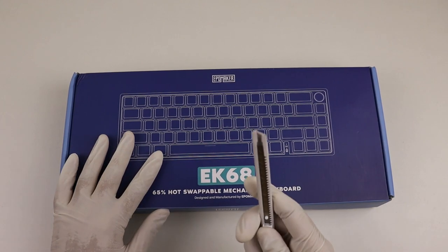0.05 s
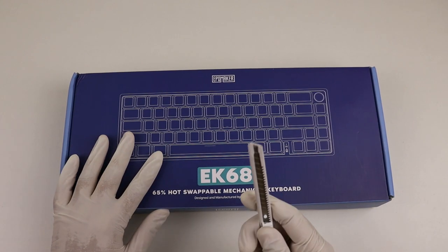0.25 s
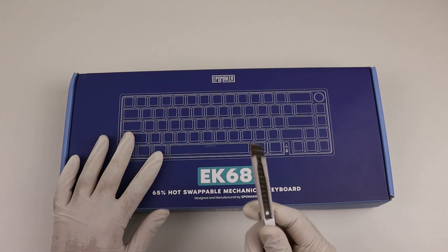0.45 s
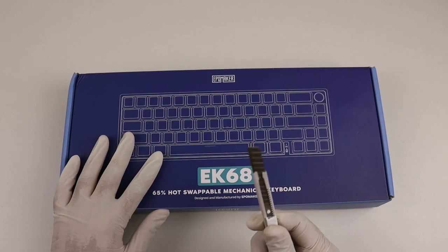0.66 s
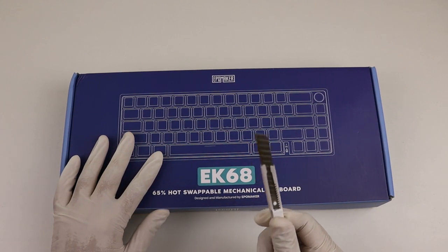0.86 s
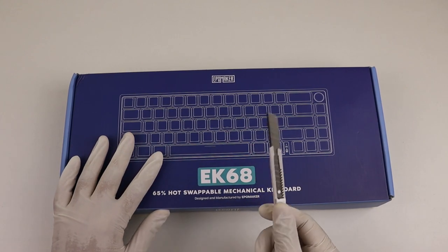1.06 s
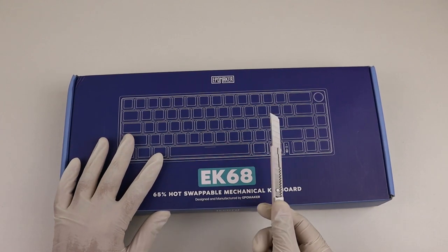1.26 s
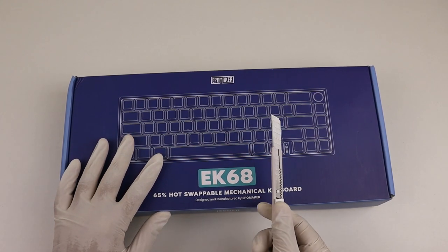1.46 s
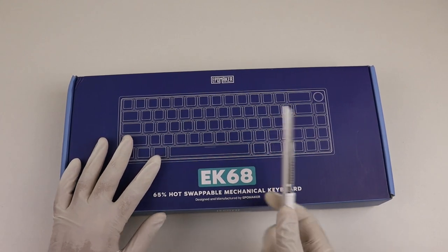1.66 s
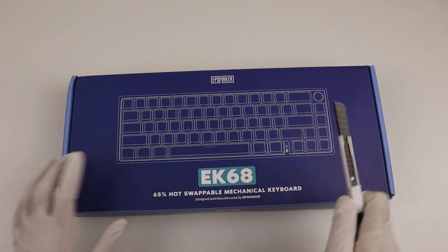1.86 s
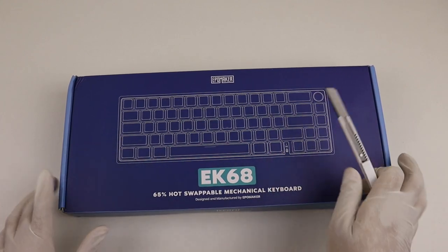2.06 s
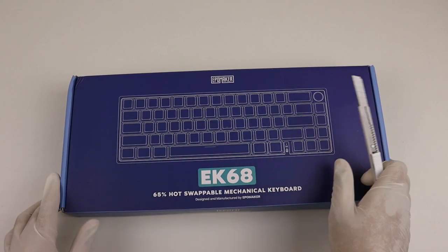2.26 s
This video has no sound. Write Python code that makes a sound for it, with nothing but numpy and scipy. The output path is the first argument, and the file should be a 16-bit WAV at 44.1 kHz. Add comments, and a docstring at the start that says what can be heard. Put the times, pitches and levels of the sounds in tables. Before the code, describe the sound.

A snap-off knife ratchets open close by, with about seventeen quick, bright clicks from 0.2 to 0.9 seconds, rattly at first and then crisper, over slight grinding and thumb rubbing. After a pause, a glove brushes faintly on cardboard from about 1.7 seconds. Near 2 seconds the knife is laid on a hollow box with a light tap and a few soft ticks. The room is small and quiet.

```python
"""Snap-off knife, slid open and put down

The slider is pushed forward close to the microphone: its spring snaps over seventeen notches, rattling
at first and crisper as the blade comes out, while the slider grinds in its track and the thumb rubs
the handle. Then the knife is laid on a hollow cardboard box, with a few ticks and the brush of a glove.
A small quiet room answers."""
import sys
import numpy as np
from scipy import signal
from scipy.fft import rfft, irfft, next_fast_len
from scipy.io import wavfile

SR = 44100
rng = np.random.default_rng(int(sys.argv[2]) if len(sys.argv) > 2 else 0)


def to_wav(sig):
    """Store sig (one row per channel, or 1-D mono) as 16-bit WAV at the path in sys.argv[1].

    Samples outside -1..1 are clipped; the rate is SR.
    """
    pcm = np.clip(np.atleast_2d(sig), -1, 1) * 32767
    pcm = np.round(pcm).astype(np.int16)
    wavfile.write(sys.argv[1], SR, pcm.T)  # frames by channels


N = 101429

# One snap per notch: t/s, ring level/dB, ring centre/Hz, handle level/dB, blade level/dB,
# sheen level/dB, blade pitch/Hz, rattle against the strike/dB, rattle t60/s
NOTCHES = [(0.2379, -22.5, 6560, -39, -28, -38, 11000.0, 1.5, 0.032),
           (0.2835, -23.5, 6700, -42, -26.5, -38.5, 10420.0, 7.5, 0.026),
           (0.3159, -21.5, 6580, -41.5, -26, -34.8, 10380.0, 4.5, 0.026),
           (0.346, -21, 6740, -39, -27, -35, 9750.0, 4.5, 0.022),
           (0.3802, -22.5, 6530, -40.5, -28, -33, 11610.0, 2.0, 0.014),
           (0.4182, -20.5, 7010, -39, -28.5, -33, 11650.0, 2, 0.014),
           (0.4527, -22, 6900, -39.5, -30, -33, 11950.0, 4, 0.014),
           (0.4889, -20.5, 6810, -41.5, -30, -35.5, 12270.0, -2.5, 0.012),
           (0.53, -17.5, 6730, -40.5, -29.5, -33.5, 8960.0, -9.5, 0.01),
           (0.5698, -15.5, 6700.0, -37.5, -31.4, -32.5, 9000.0, -15.5, 0.011),
           (0.6063, -18, 6600, -41.5, -29, -38, 8980.0, -10, 0.015),
           (0.642, -17, 6680, -42, -28.5, -39, 8960.0, -7.0, 0.008),
           (0.6742, -16, 6620, -44.5, -29, -34.5, 9930.0, -12.5, 0.011),
           (0.7007, -20.5, 6830, -46, -31.0, -31, 10060.0, -6, 0.0088),
           (0.7423, -20, 6680, -44, -32, -29.5, 9470.0, -10.5, 0.01),
           (0.8002, -23.5, 6760, -42, -31.5, -29.5, 10380.0, -1.5, 0.016),
           (0.8619, -23, 6940, -43, -33.5, -31.5, 10120.0, 2, 0.01585)]
# Colours of a snap: bright 6-7.5 kHz ring, handle body, blade zing, top sheen, recoil: f/Hz, level/dB
BRIGHT_RING = [(3500, -52), (4800, -24.5), (5500, -16), (6130, -5.5), (6340, -4.5), (6560, 0.5), (6950, -7),
               (7330, -1.5), (7750, -10.5), (8200, -26), (9800, -54)]
HANDLE_BODY = [(150, -17.5), (500, -9.5), (1100, -9), (2200, -4), (3200, -6), (4000, 0), (4700, 5.5),
               (5400, 2), (7000, -20)]
BLADE_ZING = [(6500, -35), (8200, -0.5), (9200, -3.5), (10500, -0.5), (11800, -0.5), (13000, -11.5),
              (14500, -37.5)]
TOP_SHEEN = [(11000, -36.5), (13000, -4.5), (14300, 0), (15200, 2), (15750, -1.5), (16100, -4),
             (16800, -23)]
HANDLE_RECOIL = [(20, -20.5), (40, -7), (60, 3.5), (110, 0), (200, -10.5), (450, -25), (900, -29.5),
                 (2000, -42.5)]
RING_TRIM_DB, HANDLE_TRIM_DB, BLADE_TRIM_DB, SHEEN_TRIM_DB = 0.5, 2, -.5, -1.5
BLADE_LOOSE_DB, HANDLE_LOOSE_DB = 7, 15  # how much more these parts rattle than the ring
RING_CENTRE_HZ = 6734  # of BRIGHT_RING before it is tuned to a notch
SCRAPE_LEAD_S, SCRAPE_DB, RECOIL_DB = 0.0015, -18, -47.5


def ratchet():
    """At each notch the spring scrapes up the tooth, snaps, and rings the handle and the blade."""
    out = np.zeros(N)
    for s, ring_db, ring_hz, handle_db, blade_db, sheen_db, blade_hz, rattle_db, t60 in NOTCHES:
        scrape = coloured(burst(t60=0.0044), BRIGHT_RING)
        add(out, s - SCRAPE_LEAD_S, amp(ring_db + rattle_db + SCRAPE_DB) * scrape)  # louder when loose
        tuned_ring = [(hz * ring_hz / RING_CENTRE_HZ, db) for hz, db in BRIGHT_RING]
        add(out, s, amp(ring_db + RING_TRIM_DB) * coloured(strike(rattle_db, t60), tuned_ring))
        handle_hit = strike(rattle_db + HANDLE_LOOSE_DB, t60)
        add(out, s, amp(handle_db + HANDLE_TRIM_DB) * coloured(handle_hit, HANDLE_BODY))
        blade_hit = strike(rattle_db + BLADE_LOOSE_DB, t60)
        zing = coloured(blade_hit, BLADE_ZING, peak_hz=blade_hz, peak_db=9)
        add(out, s, amp(blade_db + BLADE_TRIM_DB) * zing)
        add(out, s, amp(sheen_db + SHEEN_TRIM_DB) * coloured(blade_hit, TOP_SHEEN))
        add(out, s, amp(RECOIL_DB) * coloured(burst(t60=0.14), HANDLE_RECOIL))
    return out


# Grit under the snaps, strongest early in the push: t/s, level/dB
GRIT_FADER = [(.22, -89), (.232, -61.5), (.25, -40), (.27, -43.5), (.31, -40.5), (.42, -40.5), (.5, -49),
              (.7, -56.5), (.86, -60.5), (.9, -93)]


def grinding(grains_per_s=400, spread_db=4.5, blade_db=-9):
    """The slider catches on its steel track in tiny grains."""
    catches = rng.random(N) < grains_per_s / SR
    grains = catches * amp(spread_db * rng.standard_normal(N))
    impulse = np.ones(1)
    grain_ring = coloured(impulse, BRIGHT_RING) + amp(blade_db) * coloured(impulse, BLADE_ZING)
    grit = signal.fftconvolve(grains, grain_ring)[:N]
    return level(GRIT_FADER) * grit / grit.std()


# The knife touches the box: t/s, ring level/dB, clack level/dB, thud level/dB, rattle t60/s
TOUCHES = [(1.8690, -64, -60, -78, .005), (1.9119, -58.5, -56.5, -65.5, 0.0248),
           (1.9610, -36.5, -44, -52.5, .005), (1.9652, -54, -55.5, -68, 0.011),
           (1.9710, -56, -48.5, -52, 0.019), (1.9812, -48, -58.5, -56, .006), (2.0030, -56, -60, -67, .012),
           (2.0135, -54.5, -64, -66, 0.0071), (2.0260, -66, -69.5, -81, .008),
           (2.1670, -55.5, -60, -67, 0.013), (2.2760, -69, -66.5, -64.5, .008)]
# Colours of a touch: thin high ring, dry clack, cardboard thud: f/Hz, level/dB
TOUCH_RING = [(3600, -45), (4500, -20), (5100, -11), (5600, -8), (6400, 3), (7300, 0), (7800, -6),
              (8400, -20), (10000, -48)]
KNIFE_CLACK = [(200, -1), (900, -5), (1250, -2), (1550, 2), (2200, -4.5), (3000, 1.5), (3700, -7.5),
               (4700, 2.5), (8300, -11.5), (10500, -0.5), (13000, -8), (16000, -20)]
BOX_THUD = [(30, 5), (70, -4), (110, 9), (200, -3.5), (500, -1), (1000, -1.5), (1550, -15), (2500, -28),
            (6000, -38.5)]


def laying_down(rattle_db=-4):
    """The knife ticks against the hollow box and settles."""
    out = np.zeros(N)
    for s, ring_db, clack_db, thud_db, t60 in TOUCHES:
        add(out, s, amp(ring_db) * coloured(strike(rattle_db, t60), TOUCH_RING))
        add(out, s, amp(clack_db) * coloured(strike(rattle_db + BLADE_LOOSE_DB, t60), KNIFE_CLACK))
        add(out, s, amp(thud_db) * coloured(burst(t60=0.055), BOX_THUD))
    return out


# Friction of the thumb on the handle, then of the glove on cardboard: t/s, level/dB
THUMB_FADER = [(.225, -88.5), (.245, -53.5), (.34, -54), (.48, -56), (.54, -50.5), (.63, -56), (.71, -54),
               (.78, -53), (.87, -55), (.93, -61.5), (1.1, -87)]
GLOVE_FADER = [(1.6, -92.5), (1.78, -66), (1.87, -66), (1.95, -66.5), (2.02, -69.5), (2.055, -76.5),
               (2.085, -65), (2.13, -70), (2.3, -71)]
# Dull knocks of the hands: t/s, level/dB, t60/s
HAND_BUMPS = [(.531, -42.5, 0.028), (.718, -45.5, 0.085), (1.846, -53.5, 0.087), (1.925, -58.5, 0.074),
              (2.169, -63.5, 0.12)]
# Colours of the handling: low rub, soft brush, muffled bump: f/Hz, level/dB
THUMB_RUB = [(20, -12), (40, -5.5), (65, -0.5), (130, -5), (250, -3.5), (500, -14.5), (900, -17.5),
             (1500, -43.5)]
GLOVE_BRUSH = [(40, 0.5), (150, 6.5), (400, -5), (1200, -9), (3500, -8), (6500, -13), (9000, -26),
               (16000, -36)]
BUMP_COLOUR = [(40, -10.5), (130, 4), (250, -4), (380, -10.5), (550, -2), (800, -12), (2000, -40.5),
               (5000, -48.5)]


def hands():
    """Gloved hands rub and bump the handle and the box."""
    out = level(THUMB_FADER) * noise(THUMB_RUB) + level(GLOVE_FADER) * noise(GLOVE_BRUSH)
    for s, db, t60 in HAND_BUMPS:
        add(out, s, amp(db) * coloured(burst(t60), BUMP_COLOUR))
    return out


# Reverb send, the sound thrown at the room rather than at the microphone: t/s, level/dB
ROOM_SEND = [(.24, 1.5), (.45, -0.5), (.53, -3), (.69, -2.5), (.8, 1), (.87, -4), (1.9, -6.5)]
# Reflections off the desk and nearby things: delay/s, level/dB
REFLECTIONS = [(.0052, -26.5), (.0078, -25.5), (0.0125, -22)]
# Decay of the diffuse tail: f/Hz, t60/s
TAIL_DECAY = [(100, 0.39), (700, .45), (2500, 1), (6500, .37), (10000, .29), (15000, .22)]
# Its warm colour: f/Hz, level/dB
TAIL_COLOUR = [(100, -6), (600, 5.5), (2500, -1), (5600, -4.5), (7100, -4), (10000, -1.5), (15000, -1.5)]
BOX_ECHO_S, BOX_ECHO_DB = 0.0022, -14


def room(direct, pieces=40, drift=.04, predelay_s=.004, tail_db=-11, early_db=-10):
    """The box echoes at once; the other echoes and the tail vary at random, as if the knife moved."""
    out = direct.copy()
    add(out, BOX_ECHO_S, amp(BOX_ECHO_DB) * direct)
    send = direct * level(ROOM_SEND)
    for piece in np.array_split(np.arange(N), pieces):
        start = piece[0] / SR
        for delay, db in REFLECTIONS:
            add(out, start + delay * (1 + drift * rng.uniform(-1, 1)), amp(db) * send[piece])
        hz, t, spectra = signal.stft(rng.standard_normal(SR // 2), SR, nperseg=256)
        fade = 1000 ** (-t / along(TAIL_DECAY, hz)[:, None])
        colour = amp(along(TAIL_COLOUR, hz))[:, None]
        _, tail = signal.istft(spectra * fade * colour, SR, nperseg=256)
        tail *= amp(tail_db) / np.linalg.norm(tail)
        add(tail, 0, amp(early_db) * burst(t60=0.02))
        add(out, start + predelay_s, signal.fftconvolve(send[piece], tail))
    return out


# Background bed: f/Hz, level/dB
ROOM_BED = [(12, -32.5), (25, -13.5), (65, 0), (150, -1), (250, -1), (400, -7), (800, -9.5), (2000, -15.5),
            (6000, -17), (15500, -18), (16100, -26), (16500, -45.5)]


def room_tone(db=-66.5):
    """A faint, steady rumble and hiss."""
    return amp(db) * noise(ROOM_BED)


def strike(rattle_db, t60, rebound_s=.00095, rebound_db=-4.5, scatter=0.29):
    """The force of one sharp contact, its rebound and a rattle of loose parts."""
    force = amp(rattle_db) * burst(t60)
    force[0] += 1
    rebound_at = int(rebound_s * SR * (1 + scatter * rng.uniform(-1, 1)))
    force[rebound_at] += amp(rebound_db)
    return force


def burst(t60, size=6000):
    """Dying noise of energy 1."""
    y = rng.standard_normal(size) * 1000 ** (-np.arange(size) / SR / t60)
    return y / np.linalg.norm(y)


def coloured(force, colour, peak_hz=1000, peak_db=0, width_hz=450, window_s=.01, size=8192):
    """A force rings a colour, with an optional resonance; as much energy as rms 1 lasting window_s."""
    hz = np.fft.rfftfreq(size, 1 / SR)
    resonance_db = peak_db / (1 + (2 * (hz - peak_hz) / width_hz) ** 2)
    cepstrum = irfft(np.log(amp(along(colour, hz) + resonance_db)))
    cepstrum[1:size // 2] *= 2  # minimum phase: nothing rings before the hit
    cepstrum[size // 2 + 1:] = 0
    y = irfft(rfft(force, size) * np.exp(rfft(cepstrum)))
    return y / np.sqrt(np.sum(y ** 2) / (window_s * SR))


def noise(colour):
    """Steady coloured noise of rms 1."""
    size = next_fast_len(N + SR // 2)
    gain = amp(along(colour, np.fft.rfftfreq(size, 1 / SR)))
    y = irfft(rfft(rng.standard_normal(size)) * gain, size)[:N]
    return y / y.std()


def amp(db):
    """Decibels to gain."""
    return 10 ** (np.asarray(db) / 20)


def along(curve, hz):
    """Read a curve on a log frequency axis."""
    freqs, values = np.transpose(curve)
    return np.interp(np.log(hz + 1), np.log(freqs + 1), values)


def level(fader):
    """A fader move as a gain for each sample."""
    return amp(np.interp(np.arange(N) / SR, *np.transpose(fader)))


def add(track, s, sound):
    """Mix a sound into the track at s seconds."""
    i = int(round(s * SR))
    part = sound[:len(track) - i]
    track[i:i + len(part)] += part


def scene():
    """Knife and hands in the room, over its steady tone, in mono."""
    foley = ratchet() + grinding() + hands() + laying_down()
    return (room(foley) + room_tone())[None]


def record(dry, top_hz=16700):
    """A brick-wall low-pass cuts the highest treble."""
    size = next_fast_len(N + SR // 2)
    passband = np.fft.rfftfreq(size, 1 / SR) < top_hz
    return irfft(rfft(dry, size) * passband, size)[:, :N]


dry = scene()
out = record(dry)
to_wav(out)
```